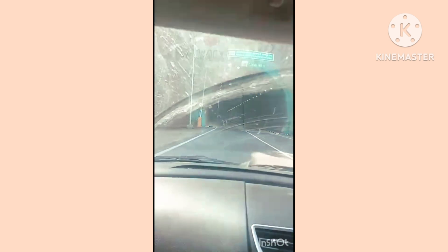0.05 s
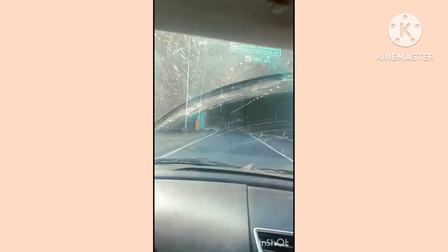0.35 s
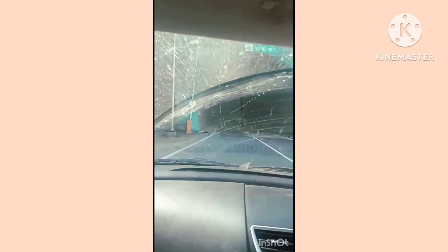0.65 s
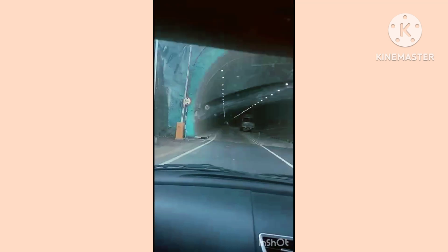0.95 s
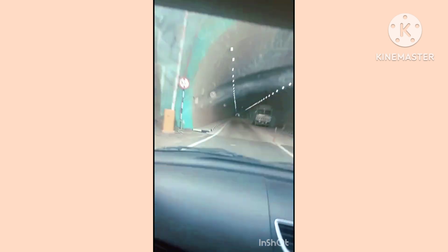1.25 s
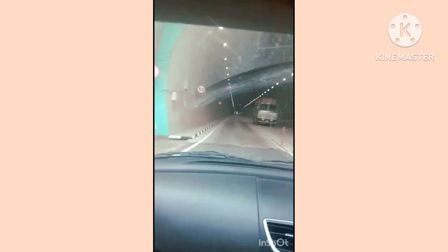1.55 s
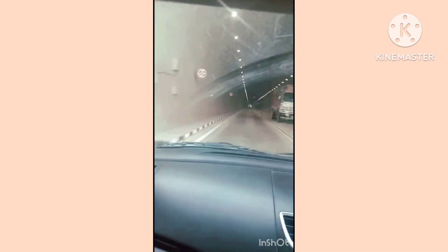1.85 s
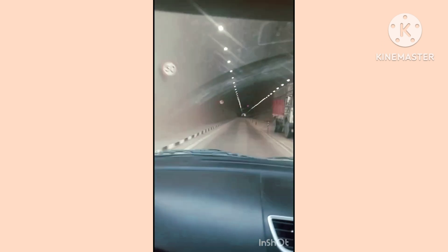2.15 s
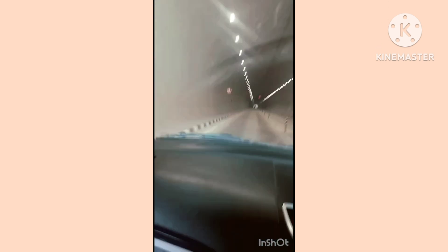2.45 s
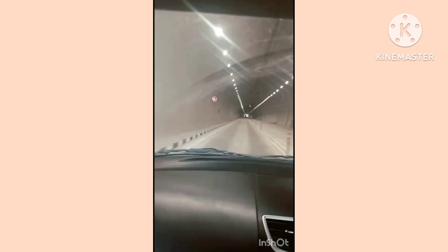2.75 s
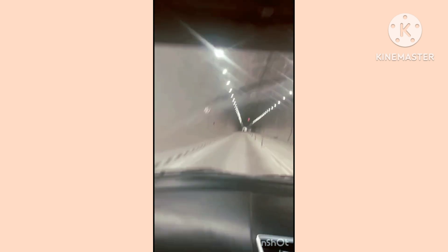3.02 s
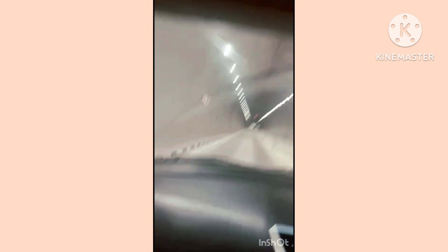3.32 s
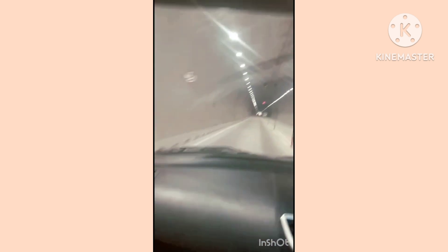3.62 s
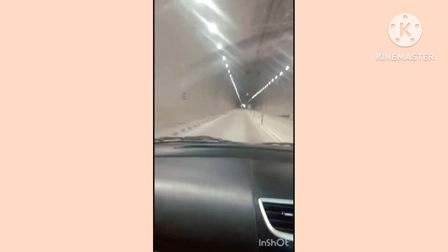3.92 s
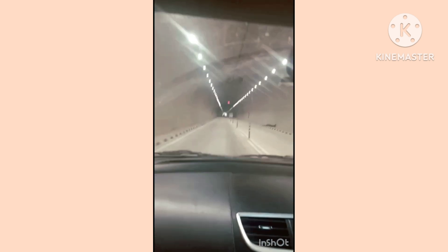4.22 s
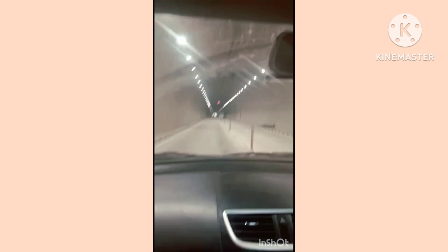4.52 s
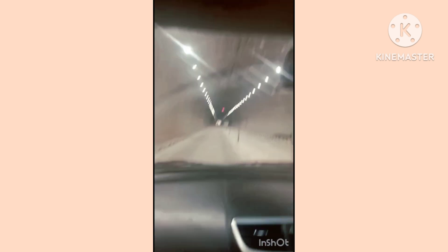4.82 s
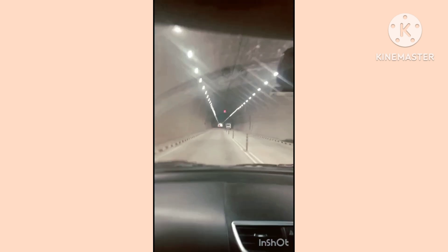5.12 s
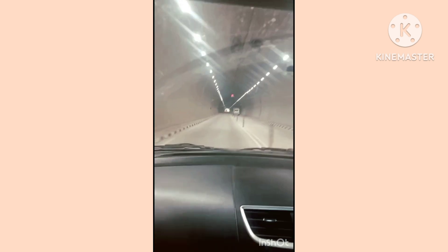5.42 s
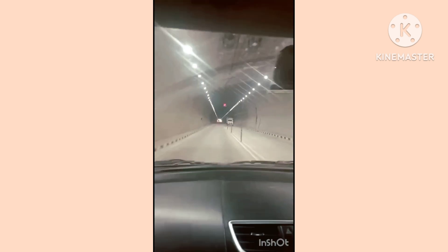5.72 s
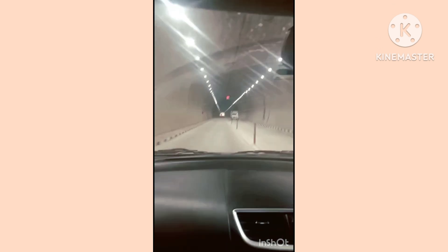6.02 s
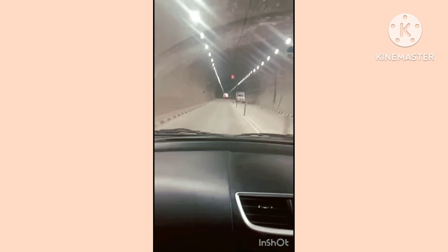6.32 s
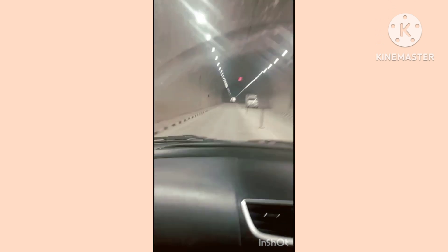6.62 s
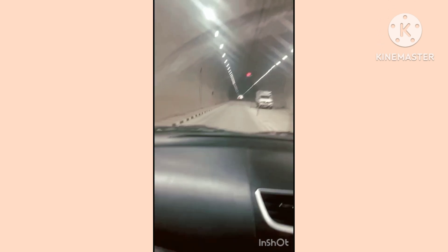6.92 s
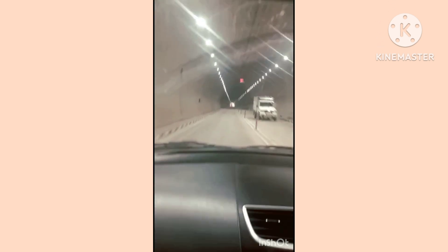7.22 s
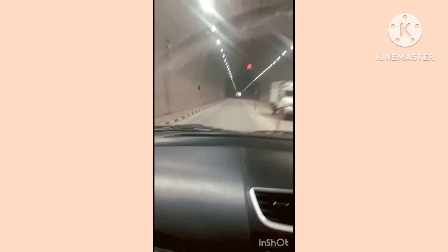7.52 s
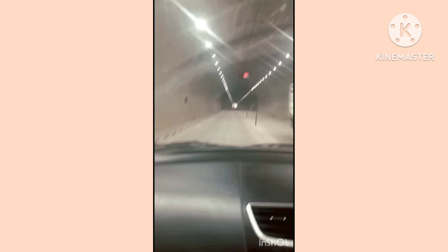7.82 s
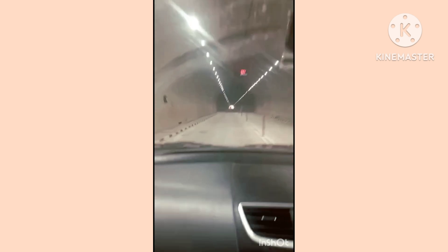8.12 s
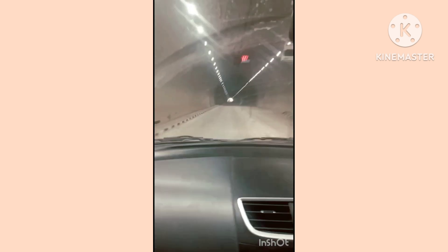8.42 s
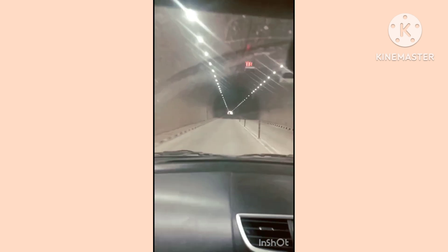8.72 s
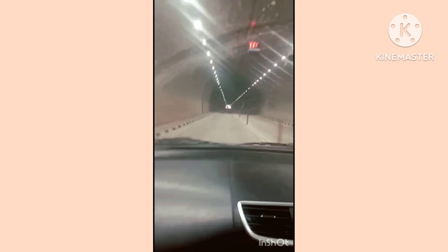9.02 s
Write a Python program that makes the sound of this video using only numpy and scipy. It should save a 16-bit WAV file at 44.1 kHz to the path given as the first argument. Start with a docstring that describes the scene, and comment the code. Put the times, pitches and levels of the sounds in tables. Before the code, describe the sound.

Low road rumble heard from a car's cabin swells into a tunnel roar, with soft bumps and oncoming vehicles whooshing by.

```python
"""Tyres roll on rough asphalt, heard inside a small car: the road shakes the body, the cabin air booms
and the treads roar. The car enters a tunnel, whose walls reflect the roar, louder and brighter.
Two lorries rush by just past the entrance, a pickup later. Bumps ring the body's low resonances,
loose trim ticks as it rubs, and air whistles faintly in a window gap."""
import sys
import numpy as np
from scipy import signal
from scipy.fft import rfft, irfft, next_fast_len
from scipy.io import wavfile
from scipy.ndimage import uniform_filter1d, map_coordinates

SR = 44100
rng = np.random.default_rng(int(sys.argv[2]) if len(sys.argv) > 2 else 0)


def bounce(signal):
    """Save signal as a 16-bit WAV file at the path given by the first command-line argument."""
    frames = np.transpose(np.atleast_2d(signal))
    limited = np.clip(frames, -1, 1)
    pcm = np.round(limited * 32767).astype(np.int16)
    wavfile.write(sys.argv[1], SR, pcm)


N = 399546
TIME = np.arange(N) / SR
PORTAL_S, PORTAL_CROSSING_S = 2.03, 0.22  # the walls close around the car: when, how fast

# Oncoming vehicles. Each row: arrival alongside in seconds, seconds alongside, relative level in dB.
LORRY_PASSES = [(2.13, 0.18, -3.5), (2.58, 0.55, 0)]
PICKUP_PASSES = [(7.92, 0.17, -1)]
# The rush of their tyres. Each row: frequency in Hz, relative level in dB.
RUSH_SPECTRUM = [(900, -23.5), (1900, -4), (2550, 1.5), (3150, -4), (3700, -2), (4050, -3.5), (4400, -14.5),
                 (4900, -37.5), (5500, -60)]


def amp(db):
    """Decibels to amplitude gain."""
    return np.exp(np.asarray(db) * np.log(10) / 20)


def unit(x):
    """Scale to rms 1."""
    return x / np.sqrt(np.mean(x ** 2) + 1e-20)


def step(s, seconds):
    """A smooth change from 0 to 1, centred on time s and lasting about the given time."""
    return (1 + np.tanh(2 * (TIME - s) / seconds)) / 2


def bell(hz, centre, width):
    """A Gaussian of height 1 on the frequency axis."""
    return np.exp(-((hz - centre) / width) ** 2)


def wobble(rate):
    """Slow modulation: a smooth random curve, rate knots a second."""
    return map_coordinates(rng.standard_normal(int(N * rate / SR) + 4), [TIME * rate])


def filtered(x, response):
    """Linear filtering: the spectrum of x times a function of frequency."""
    size = next_fast_len(N + SR // 2)
    return irfft(rfft(x, size) * response(np.fft.rfftfreq(size, 1 / SR)), size)[:N]


def spectrum_db(spectrum, hz):
    """Interpolate (Hz, dB) points along a logarithmic frequency axis."""
    knots_hz, db = np.transpose(spectrum)
    return np.interp(np.log(hz + 1), np.log(knots_hz), db)


def noise(spectrum):
    """Coloured noise of rms 1, its spectral density shaped by (Hz, dB) points."""
    size = next_fast_len(N, real=True)
    hz = np.fft.rfftfreq(size, 1 / SR)
    white = rng.standard_normal(2 * len(hz)).view(complex)
    return unit(irfft(white * amp(spectrum_db(spectrum, hz)), size)[:N])


def steadied(x, seconds):
    """Division by the running rms evens out swells longer than the given time."""
    power = np.abs(uniform_filter1d(x ** 2, int(seconds * SR)))
    return x / np.sqrt(power + 1e-12)


def patchy(x, depth_db, size=512, above_hz=100):
    """Random gain patches in time and frequency make x flicker above a corner; the result has rms 1."""
    hz, _, spectra = signal.stft(x, SR, nperseg=size)
    field = uniform_filter1d(rng.standard_normal(spectra.shape), size=3, axis=0)
    field = uniform_filter1d(field, size=5, axis=1)
    reach = hz ** 8 / (hz ** 8 + above_hz ** 8)
    gain = amp(depth_db * reach[:, None] * np.tanh(unit(field)))
    gain /= np.sqrt(np.mean(gain ** 2, axis=1, keepdims=True))
    return unit(signal.istft(spectra * gain, nperseg=size)[1][:N])


def grit(rate, spread_db, life_s):
    """Shot noise as an envelope of rms 1: tiny decaying impacts of random size, rate a second."""
    when, strength = rng.random((int(rate * N / SR), 2)).T
    sizes = amp(-spread_db * np.log(1 - 0.95 * strength))
    hits = np.bincount((when * N).astype(int), sizes, N)
    return unit(signal.lfilter([1], [1, -np.exp(-1 / (life_s * SR))], hits))


def passing(events, level_db, rise, fall):
    """A gain that rises to each event, holds and falls (slopes in dB/s); events add in power."""
    gains = []
    for s, length, db in events:
        before, after = np.maximum(s - TIME, 0), np.maximum(TIME - s - length, 0)
        gains.append(amp(level_db + db - rise * before - fall * after))
    return np.linalg.norm(gains, axis=0)


def faint_hiss():
    """Stationary noise lies under everything."""
    # The hiss. Each row: frequency in Hz, relative level in dB.
    hiss_spectrum = [(2500, 1), (3500, 6.5), (4100, 4), (4500, 1), (4620, 9.5), (4850, -3.5), (5500, -8.5),
                     (7000, -9.5), (12000, -11), (15000, -14)]
    return amp(-87.5) * noise(hiss_spectrum)


def trim(level_db=-9.5, ring_db=9.5, ring_width_hz=800, rise_s=0.0042, size=4096):
    """Friction: loose plastic parts rub briefly, each coloured by its own resonance."""
    # Rubs. Each row: time in seconds, relative level in dB, decay time in seconds, resonance in Hz.
    ticks = [(2.088, -37, 0.011, 3400), (2.152, -39.5, .012, 3600), (2.277, -47, .004, 11300),
             (2.558, -39, 0.0077, 7500), (2.71, -35.5, 0.0078, 9700), (2.879, -41, 0.0099, 10900),
             (3.03, -47, .02, 11100), (3.378, -50, .006, 6300), (3.424, -49, 0.0055, 6730),
             (7.902, -60, .012, 6950), (8.065, -43.5, 0.014, 6550), (8.16, -56, 0.0096, 6960),
             (8.357, -58, .006, 7270)]
    # Rubbing plastic. Each row: frequency in Hz, relative level in dB.
    plastic_spectrum = [(1500, -5), (3500, 12.5), (4200, 6), (5200, -10.5), (7000, 0), (8300, -10.5),
                        (9600, -0.5), (11500, -15.5), (13000, -34)]
    out = np.zeros(N)
    hz = np.fft.rfftfreq(size, 1 / SR)
    age = (np.arange(size) - size // 2) / SR
    plastic_db = spectrum_db(plastic_spectrum, hz)
    for s, db, decay_s, ring_hz in ticks:
        colour = amp(plastic_db + ring_db * bell(hz, ring_hz, ring_width_hz))
        scrape = unit(irfft(rfft(rng.standard_normal(size)) * colour))
        envelope = np.exp(np.minimum(age / rise_s, -age / decay_s))
        out[round(s * SR) - size // 2:][:size] += amp(level_db + db) * envelope * scrape
    return out


def whistle():
    """Resonance: air noise in a window gap is filtered into hoarse, slightly wavering tones."""
    # The draught. Each row: start of full strength in seconds, length in seconds, relative level in dB.
    draught = [(3.65, .66, -1)]
    # The gap's resonances. Each row: frequency in Hz, width in Hz, relative level in dB.
    resonances = [(2544, 160, 2.5), (2780, 190, -6), (3774, 210, -12)]
    gust = passing(draught, -53.5, rise=14, fall=41)
    lingering = passing(draught, -66, rise=18, fall=3.7)
    gap = lambda f: sum(amp(db) / (1 + (2 * (f - hz) / width) ** 2) ** 2 for hz, width, db in resonances)
    tones = steadied(filtered(rng.standard_normal(N), gap), seconds=0.092)
    return np.hypot(gust, lingering) * amp(1.2 * wobble(14)) * tones


def jolts(rise_s=0.0048):
    """Damped vibration: each bump in the road rings a low resonance of the body."""
    # Bumps. Each row: start in seconds, level in dB, resonance in Hz, seconds to decay by 60 dB.
    bumps = [(0.254, -20.5, 118, .15), (0.662, -20, 136, .17), (0.763, -17, 139, 0.19),
             (1.236, -24, 133, .15), (2.074, -14.5, 122, .15), (2.146, -13, 142, 0.13),
             (2.264, -18, 47, .27), (3.512, -16.5, 127, 0.13), (3.975, -22, 153, 0.12),
             (4.755, -15, 147, 0.083), (5.735, -17, 129.4, 0.2), (6.067, -15.5, 111, .14),
             (6.58, -17.5, 132, 0.17), (7.963, -22, 113, .15), (8.311, -17.5, 163, 0.36),
             (8.685, -13, 121, 0.26)]
    out = np.zeros(N)
    for s, db, hz, t60 in bumps:
        age = np.maximum(TIME - s, 0)
        envelope = (1 - np.exp(-age / rise_s)) * amp(-60 * age / t60)
        out += amp(db) * envelope * np.sin(2 * np.pi * hz * age)
    return out


def pickup():
    """A passing source: the pickup's rush swells as it nears, and its tyres sizzle over fine grit."""
    # Tyres on grit. Each row: frequency in Hz, relative level in dB.
    sizzle_spectrum = [(3000, -13.5), (4250, 5), (4800, -14.5), (5500, -17.5), (6300, -1.5), (6650, -9),
                       (6950, 3.5), (7300, -6), (8400, -24), (9500, -8.5), (11000, -16), (13000, -30)]
    fine_grit = grit(rate=170, spread_db=2.2, life_s=0.012)
    rush = passing(PICKUP_PASSES, -58, rise=8, fall=1.5)
    rush *= patchy(noise(RUSH_SPECTRUM), depth_db=9.5, size=1024, above_hz=1800)
    sizzle = passing(PICKUP_PASSES, -78, rise=12, fall=17)
    sizzle *= patchy(noise(sizzle_spectrum), depth_db=11)
    return rush + sizzle * fine_grit


def lorries(shadow_db=13, wake_lag_s=0.08):
    """Acoustic shadow: a lorry's body screens most of the rumble and tyre noise until it is alongside."""
    # The lorries' spectra. Each row: frequency in Hz, relative level in dB.
    rumble_spectrum = [(20, -21), (55, 11.5), (90, 1.5), (160, -5.5), (225, 6.5), (300, -6), (440, 1),
                       (620, -0.5), (780, -9.5), (1500, -48), (3000, -110)]  # engines and bodies, heard through the doors
    hiss_spectrum = [(3500, -12.5), (4800, 4), (5450, -9), (6150, 3.5), (6900, 1.5), (7600, -7),
                     (8300, -17), (8900, -4), (9450, -3.5), (10300, -12.5), (11500, -25), (13500, -38.5)]  # tyre hiss
    spray_spectrum = [(8500, -37), (10000, -4.5), (11100, 3), (11850, -8), (12300, -22), (13500, -28.5),
                      (15000, -39)]  # the finest spray, lost first
    sizzle_spectrum = [(5500, -30.5), (6300, -12), (7300, -14.5), (8500, -27.5), (9050, 1.5), (9450, -1.5),
                       (9900, -25.5), (13000, -38)]  # thin sizzle ahead and behind
    wake_spectrum = [(3000, -10.5), (4200, 17), (4650, 5.5), (5000, -2.5), (5500, -10.5), (6500, -7.5),
                     (8300, -2), (9400, -3), (9900, -21.5), (13000, -40)]  # air swishing behind the last lorry
    rumble = passing(LORRY_PASSES, -36.5, rise=30, fall=26) * noise(rumble_spectrum)
    rush = passing(LORRY_PASSES, -50, rise=23, fall=20)
    rush *= patchy(noise(RUSH_SPECTRUM), depth_db=4.5, size=768, above_hz=4200)
    hiss = passing(LORRY_PASSES, -66, rise=24, fall=38)
    hiss *= patchy(noise(hiss_spectrum), depth_db=7.5, size=384)
    spray = passing(LORRY_PASSES, -73.5, rise=25, fall=89)
    spray *= patchy(noise(spray_spectrum), depth_db=7, size=384) * amp(2.0 * wobble(25))
    sizzle = passing(LORRY_PASSES, -79, rise=34, fall=26)
    sizzle *= patchy(noise(sizzle_spectrum), depth_db=11) * amp(4.0 * wobble(18))
    s, length, db = LORRY_PASSES[-1]
    wake = passing([(s + wake_lag_s, length, db)], -62, rise=45, fall=42)
    wake *= patchy(noise(wake_spectrum), depth_db=11)
    crackle = (hiss + spray) * grit(rate=330, spread_db=0.5, life_s=0.007)
    first_arrival_s = LORRY_PASSES[0][0]
    shadow = amp(shadow_db * (step(first_arrival_s, seconds=0.044) - 1))
    return shadow * (rumble + rush + crackle) + sizzle + wake


def tunnel(mouth_s=1.58):
    """Reflection: bright tyre noise echoes from the walls."""
    # Reflected tyre noise. Each row: frequency in Hz, relative level in dB.
    echo_spectrum = [(700, -24), (1400, 3.5), (2000, 5.5), (2400, 4.5), (2750, 5), (3100, 0.5),
                     (3500, -0.5), (4000, -10), (4300, -23), (4900, -33.5), (7000, -55)]
    own_tyres = amp(-79.5)
    spill = step(mouth_s, seconds=0.6)  # the lorries' noise spills from the tunnel mouth
    lorry_tyres = passing(LORRY_PASSES, -49, rise=12, fall=10) * spill
    pickup_tyres = passing(PICKUP_PASSES, -51, rise=3.2, fall=0.8) * step(PORTAL_S, PORTAL_CROSSING_S)
    gain = np.sqrt(own_tyres ** 2 + lorry_tyres ** 2 + pickup_tyres ** 2) * amp(0.78 * wobble(14))
    # Separately, random gain patches add a watery flicker to the treble.
    return gain * patchy(noise(echo_spectrum), depth_db=13, size=1024, above_hz=2700)


def road(cruise_db=-38, deep_db=-7.0, enclosure=0.96, edge_s=0.031):
    """Forced vibration: on rough asphalt the cabin air booms, the panels drone and the treads roar."""
    # Road noise builds toward the portal, peaks beside the lorries, then settles.
    # Each row: time in seconds, level in dB (only its distance from cruise_db counts).
    rolling_levels = [(0, -51), (0.9, -47), (1.55, -43), (2.02, -39.5), (2.13, -33), (3.45, -32.5),
                      (3.85, -37.5), (5.2, -38), (9.05, -35.5)]
    # Rougher (+) or smoother (-) asphalt.
    # Each row: start in seconds, length in seconds, extra boom in dB, extra drone in dB.
    stretches = [(0, 0.42, 0, 0), (0.423, 0.16, -3.5, 1), (0.66, 0.14, 0.5, 0), (0.923, 0.21, -2, 0.5),
                 (1.245, 0.14, 2, 1), (2.035, 0.072, 8.5, 8), (2.118, 0.27, 3.5, 3.5), (3.397, 0.1, 2.5, 1),
                 (3.647, 0.83, -1, 0.5), (4.567, 0.39, 0.5, 1), (5.715, 0.4, 1, -1), (6.308, 0.17, -3, -2),
                 (7.546, 0.14, -1.5, 0.5), (8.423, 0.19, 0.5, 0), (8.63, 0.55, 1, -0.5)]
    # The spectra of rolling. Each row: frequency in Hz, relative level in dB.
    boom_spectrum = [(15, -41.5), (30, -21), (45, -13.5), (65, -10), (78, -8.5), (98, -0.5), (126, 0),
                     (146, -2.5), (175, -3), (205, -14), (280, -29.5), (600, -91.5)]  # cabin air
    deep_spectrum = [(15, -31.5), (30, -19), (45, 0), (63, 11), (82, 3), (100, 7), (130, -11), (174, 6),
                     (205, -16.5), (300, -73.5)]  # bass added between the walls
    drone_spectrum = [(120, -28.5), (185, -3.5), (226, 4.5), (256, -2.5), (295, -1.5), (340, -4.5),
                      (385, -3.5), (450, -5), (540, -11), (640, -24.5), (1200, -94)]  # panels
    open_roar_spectrum = [(300, -20.5), (470, 0), (580, -3.5), (720, -1), (900, -2.5), (1060, 3),
                          (1200, -4), (1480, -9.5), (1800, -8.5), (2150, -16), (2450, -24.5), (2750, -50.5),
                          (4500, -64)]  # treads in the open
    tunnel_roar_spectrum = [(300, -6.5), (480, -5.5), (570, -1), (700, 0), (850, -1), (1020, 1.5),
                            (1150, -3), (1300, -7.5), (1550, -12.5), (1750, -14), (2300, -21),
                            (4500, -71.5)]  # treads in the tunnel
    swell_db = np.interp(TIME, *np.transpose(rolling_levels)) - cruise_db
    boom_db = -29 + 0.39 * swell_db
    drone_db = -36.5 + 0.66 * swell_db
    roar_db = -37 + 0.96 * swell_db
    for s, length, extra_boom_db, extra_drone_db in stretches:
        on_stretch = step(s, edge_s) - step(s + length, edge_s)
        boom_db += extra_boom_db * on_stretch
        drone_db += extra_drone_db * on_stretch
    inside = enclosure * step(PORTAL_S, PORTAL_CROSSING_S)  # the tunnel's share of the treads' power
    air = noise(boom_spectrum) + amp(deep_db) * np.sqrt(inside) * noise(deep_spectrum)
    treads = np.sqrt(1 - inside) * noise(open_roar_spectrum)
    treads += np.sqrt(inside) * noise(tunnel_roar_spectrum)
    boom = amp(boom_db + 0.83 * wobble(9)) * steadied(air, seconds=0.13)
    drone = amp(drone_db) * steadied(noise(drone_spectrum), seconds=0.16)
    roar = amp(roar_db) * patchy(treads, depth_db=7.5, size=1024, above_hz=1840)
    return boom + drone + roar


def cabin(x, spacing_hz=34, ripple_db=1.7):
    """Interference: reflections between glass and dashboard give peaks, notches and a fine ripple."""
    # Peaks and notches. Each row: centre in Hz, half width in Hz, gain in dB.
    peaks = [(231.6, 5.1, 2), (327, 11, -1), (430, 22, 1), (651.5, 21, -4), (690, 16, 2), (736, 19, -1),
             (867, 35, 3.5), (927, 11, -2), (975, 34, 1.5), (1310, 17, 2.5), (1385, 16, -0.5),
             (2280, 87, -2), (3380, 150, 1), (4070, 120, 2)]
    knots = rng.standard_normal(1500)
    ripple = lambda hz: np.interp(hz / spacing_hz, np.arange(len(knots)), knots) * hz / (hz + 500)
    peaks_db = lambda hz: sum(db * bell(hz, centre, width) for centre, width, db in peaks)
    return filtered(x, lambda hz: amp(peaks_db(hz) + ripple_db * ripple(hz)))


def scene():
    """Superposition at the front seat: road and traffic through the cabin, plus the car's own noises."""
    outside = road() + tunnel() + lorries() + pickup()
    return (cabin(outside) + jolts() + whistle() + trim() + faint_hiss())[None]


def record(dry, cutoff_hz=15400):
    """Band limiting: an ideal low-pass filter removes everything above the cutoff."""
    return filtered(dry[0], lambda hz: hz < cutoff_hz)[None]


dry = scene()
out = record(dry)
bounce(out)
```